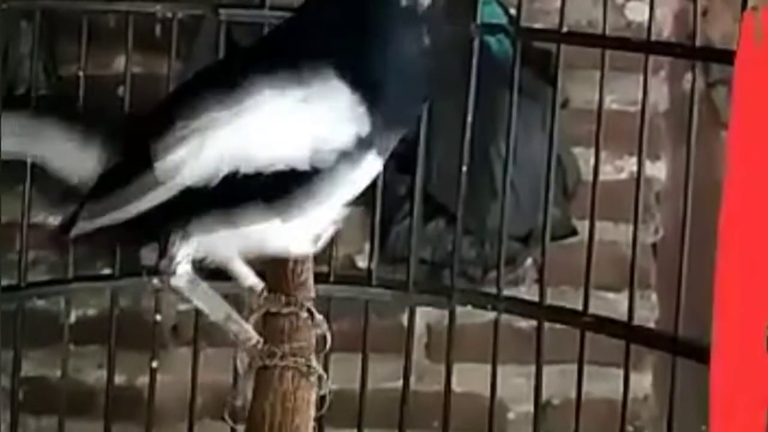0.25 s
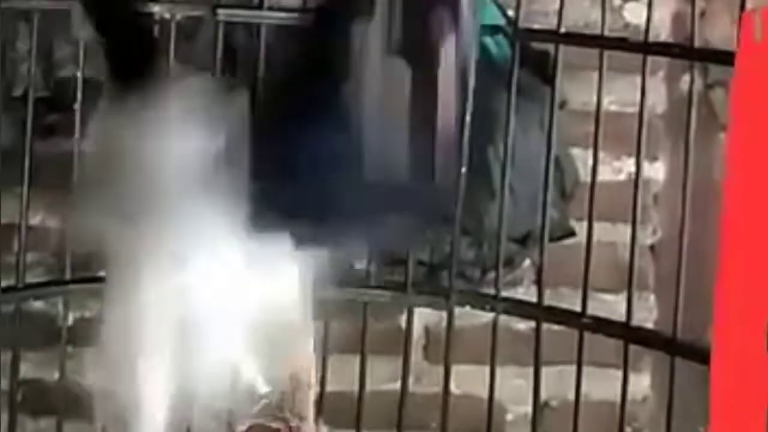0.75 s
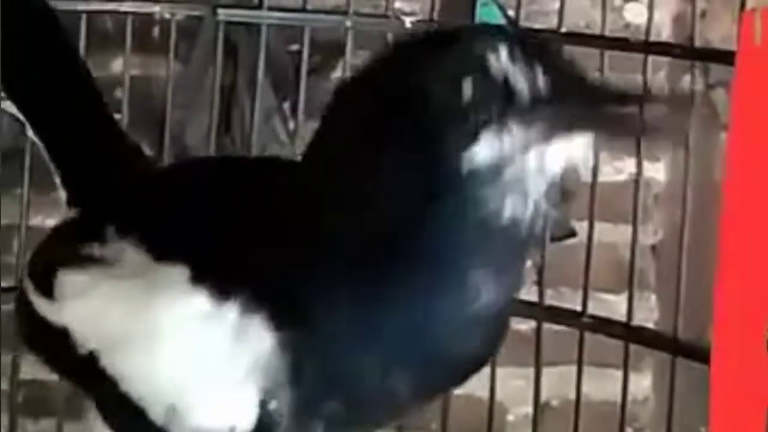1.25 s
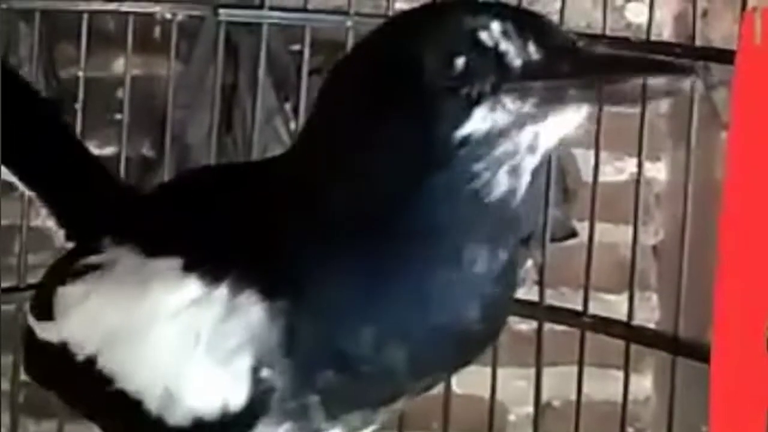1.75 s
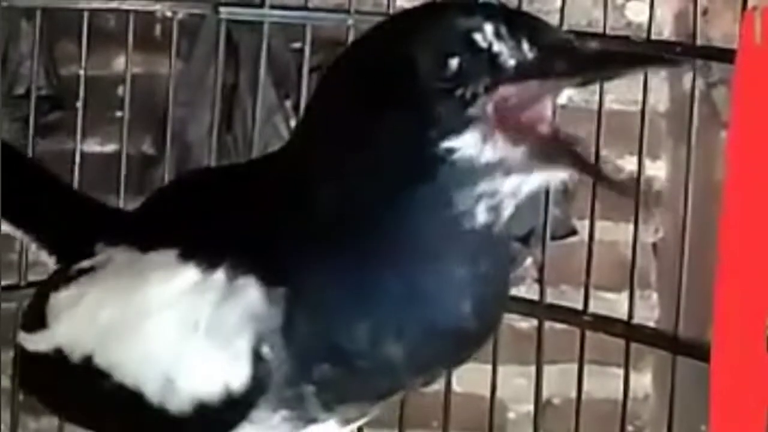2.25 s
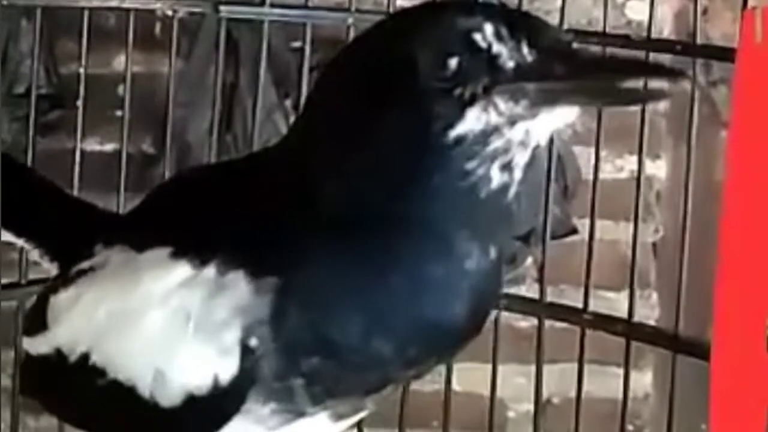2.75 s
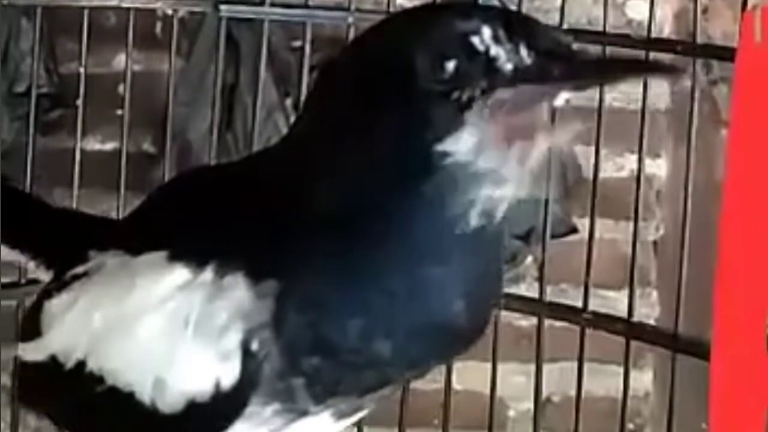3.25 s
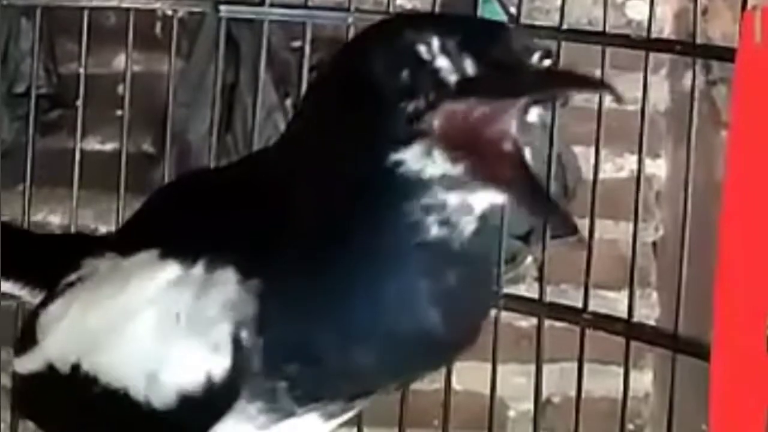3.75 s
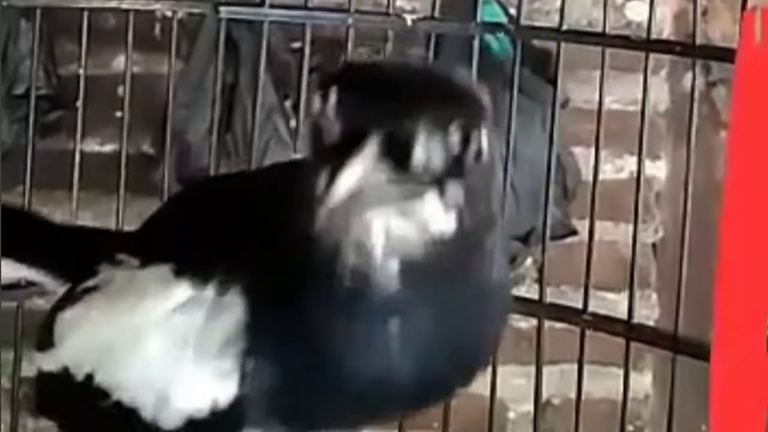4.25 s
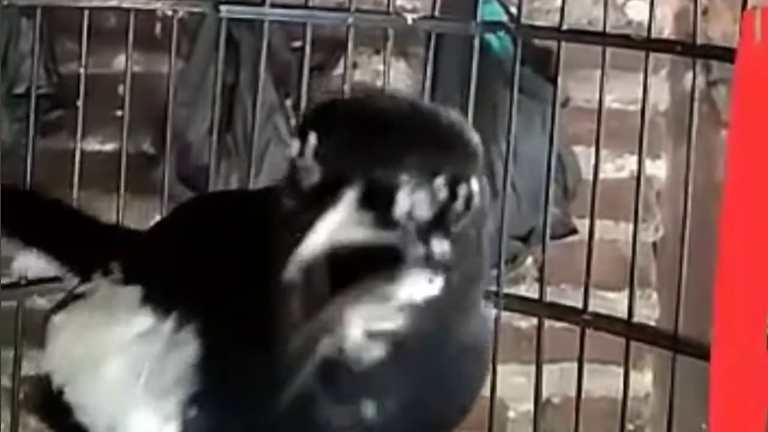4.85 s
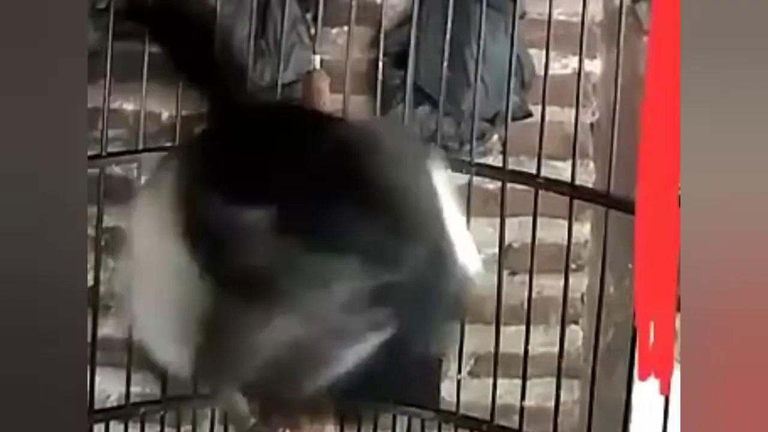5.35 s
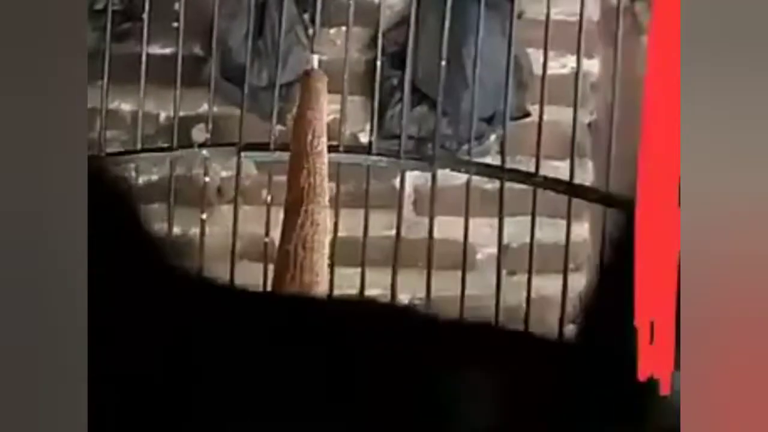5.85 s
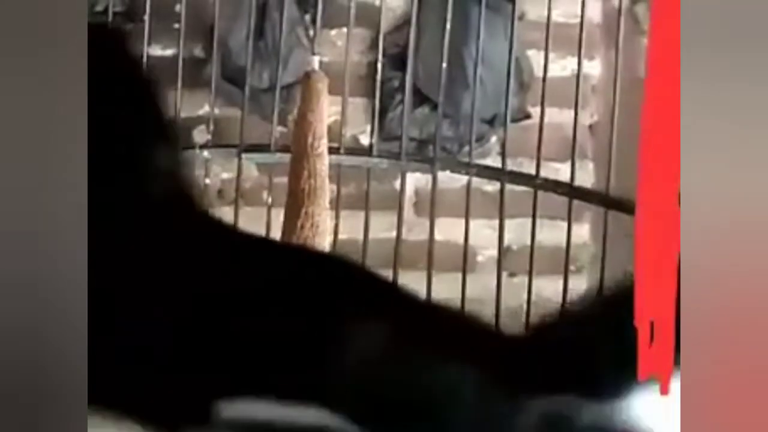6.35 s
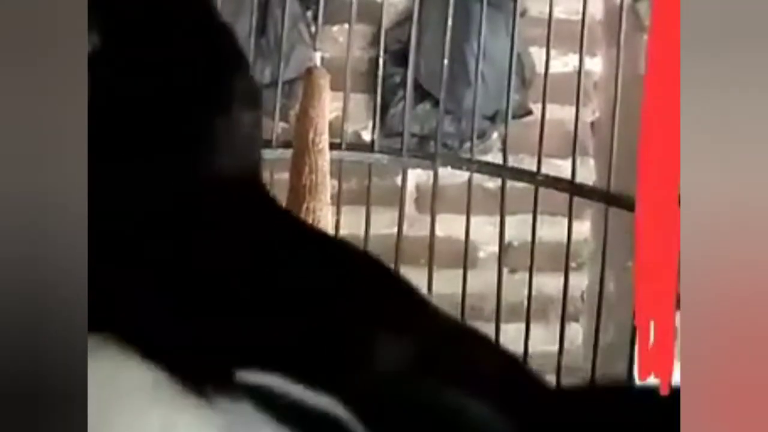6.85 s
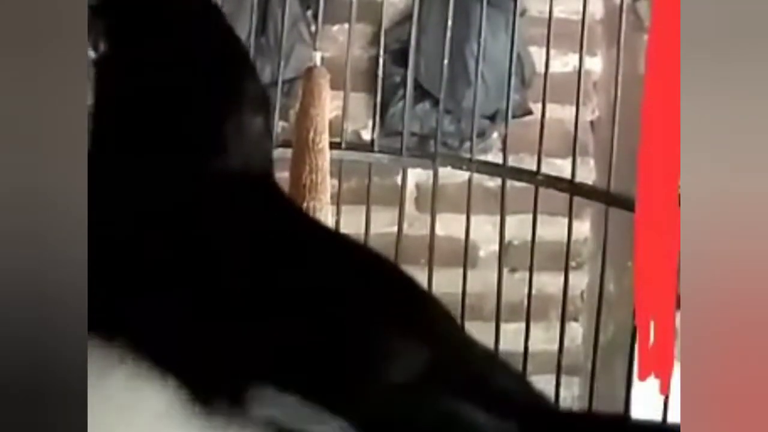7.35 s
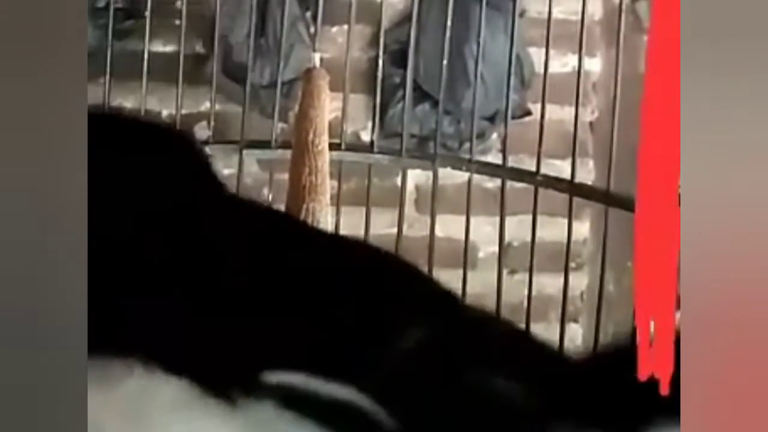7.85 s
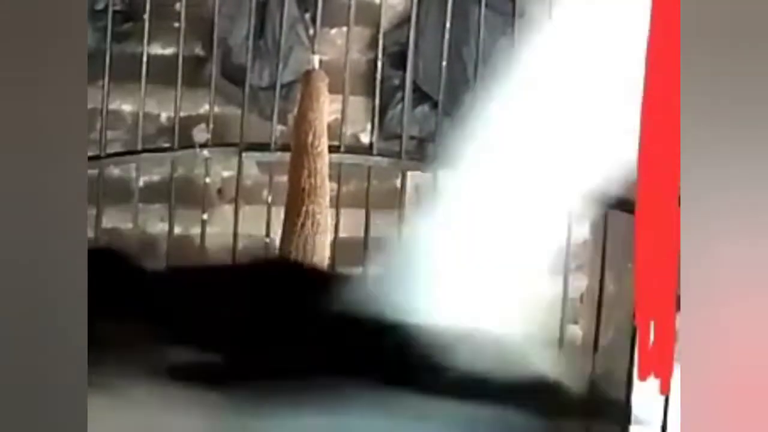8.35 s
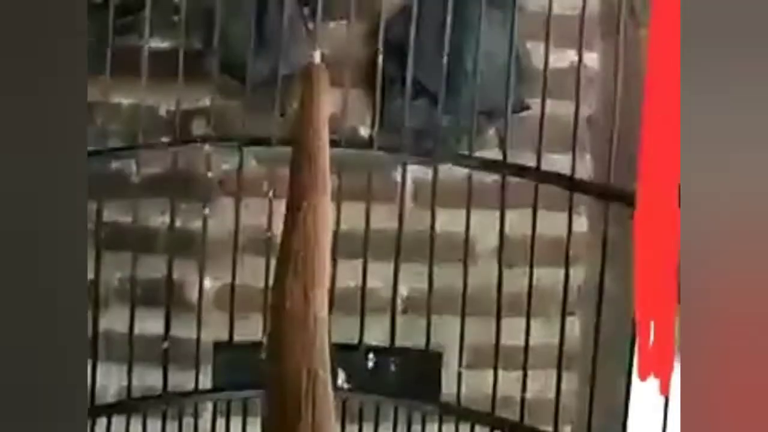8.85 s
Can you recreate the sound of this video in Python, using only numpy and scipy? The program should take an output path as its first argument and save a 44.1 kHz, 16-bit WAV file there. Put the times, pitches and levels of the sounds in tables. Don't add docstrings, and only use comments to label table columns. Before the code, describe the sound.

A caged songbird sings very close to a stereo microphone in a small room with short reflections and a low murmur. From 0.1 to 1.3 seconds it throws out sharp high notes, quick plunges, whistles and noisy rasps; a second bird behind adds softer, lower, nearly pure whistles until about 2.4. Two downward pews come near 1.4 and 1.6, a shaking note at 1.85, then a rapid clicking trill from 2 to 2.5. Softer whistles, a raspy churr at 3.1 and buzzing arched notes follow. Forceful whistles strike around 4.4 and 4.6, then a second trill runs from 5 to 5.5. Bright loud whistles and a squeal fill 5.9 to 6.5. A thin high glide sinks from 6.7 to 7.4. Rasps sound at 7.7 over a faint distant two-toned hoot, 7.5 to 8. Nasal dips, quick leaps and a quavering whistle end around 9. Breath puffs flutter throughout.

```python
import sys
import numpy as np
from scipy import signal
from scipy.fft import rfft, irfft, next_fast_len
from scipy.io import wavfile
from scipy.ndimage import uniform_filter1d, minimum_filter1d

SR = 44100
rng = np.random.default_rng(int(sys.argv[2]) if len(sys.argv) > 2 else 0)


def magnitude_from_level(level_db):
    exponent = np.asarray(level_db, float) / 20
    return 10 ** exponent


def transcribe(signal):
    frames = np.atleast_2d(signal).T
    limited = np.clip(frames, -1, 1)
    pcm = np.round(limited * 32767).astype(np.int16)
    wavfile.write(sys.argv[1], SR, pcm)


N = 400869

# frequency in Hz, level in dB per Hz.
FLOOR_COLOUR = [(20, -11), (50, -19), (110, -33), (480, -39), (800, -31), (13000, -34)]
BUFFET_COLOUR = [(25, -5), (120, -3), (250, -9), (1200, -19), (2500, -20)]
HISS_COLOUR = [(1000, -26), (4000, -7.5), (13500, -9)]
RASP_COLOUR = [(30, -19.5), (600, -15), (3000, 8.5), (13500, -1.5)]
THIN_COLOUR = [(300, -42.5), (2200, 0.5), (4000, -5), (6500, -3.5), (13500, -12.5)]
CLICK_COLOUR = [(1000, -27), (3500, -12.5), (5000, -1), (7500, -4), (13500, -14.5)]

# time in seconds, left lag in samples, left minus right in dB.
BEAK = [
    (0, 5.5, 6.5),
    (5, 4, 3),
    (7.1, 3, 6),
    (7.7, -0.5, 11.5),
]
FAR_LAG, FAR_PAN_DB = -5, 9

# start in seconds, length in seconds, start pitch in Hz, end pitch in Hz, level in dB.
SIDE_NOTES = [(.115, 0.034, 764, 780, -51), (.352, 0.016, 4480, 4590, -15),
              (1.095, 0.028, 3950, 3503, -27.5), (1.1, 0.04, 1967, 1730, -27.5),
              (4.13, 0.054, 5020, 3220, -21), (5.255, 0.035, 1330, 1177, -32),
              (8.91, 0.037, 4300, 3600, -28.5), (8.925, 0.052, 6220, 5100, -34)]
HOOKS = [(.143, 0.055, 7890, 5300, -22.5)]
WHISTLES = [(.435, 0.085, 2143, 2390, -26.5), (.5, 0.076, 2330, 2283, -10.5),
            (1.28, 0.081, 2270, 2450, -23.5), (1.29, 0.03, 2854, 3005, -14), (2.36, 0.17, 1846, 1978, -9.5),
            (2.555, 0.23, 2343, 2393, -19.5), (2.835, 0.083, 2884, 2914, -24.5),
            (4.98, 0.031, 1360, 1190, -19), (5.03, 0.078, 1743, 2004, -20), (5.09, 0.076, 2243, 1929, -19),
            (8.58, 0.072, 2273, 1994, -20), (8.975, 0.027, 2480, 2432, -15)]
QUAVERS = [
    (0.476, 0.035, 3410, 3786, -18.5),
    (1.847, .12, 3330, 3475, -18),
    (4.868, 0.1, 3372, 3894, -15.5),
]
CHIRPS = [(.74, 0.066, 2757, 2410, -28), (.83, .08, 2670, 2590, -26.5)]
FLICKS = [(.93, 0.069, 3116, 3310, -6)]
PEWS = [(1.354, 0.03, 2500, 1350, -17), (1.635, 0.037, 2598, 1396, -16.5)]
PEW_OVERTONES = [(1.368, 0.021, 3864, 2750, -19.5), (1.652, 0.026, 3870, 2890, -24.5)]
NASALS = [(2.585, 0.058, 1387, 1247, -33), (5.555, 0.069, 1321, 1280, -27),
          (5.565, 0.052, 1392, 1335, -34.5)]
CHURRS = [(3.036, 0.16, 998, 993.5, -36), (7.66, .148, 1054, 1023, -41)]
ARCHES = [(3.328, 0.15, 2966, 2437, -28.5), (8.007, 0.17, 2988, 2449, -30.5)]
DIPS = [(3.597, .165, 2455, 2372, -28.5)]
COOS = [(3.772, .155, 1903, 1755, -23.5)]
UPBEATS = [(4.337, 0.018, 2125, 2457, -13), (4.593, 0.028, 2070, 2560, -10.5),
           (5.882, 0.055, 2900, 2900, -7), (6.07, 0.043, 2290, 2150, -18.5), (6.405, 0.054, 2670, 3000, -9)]
SPIKES = [(4.35, 0.013, 2110, 3490, -13.5), (4.609, 0.013, 2084, 3210, -13.5),
          (6.106, 0.011, 2080, 3460, -14.5)]
SHOUTS = [(4.36, 0.07, 2308, 2450, -8.5), (4.618, 0.06, 2400, 2290, -8), (6.111, 0.041, 2480, 2503, -8)]
CROAKS = [(5.41, 0.12, 1920, 2084, -38.5), (5.48, 0.075, 2915, 2586, -34.5)]

# start in seconds, length in seconds, start pitch in Hz, end pitch in Hz, level in dB.
FAR_SWELLS = [(.175, 0.099, 1870, 1990, -31), (.255, .08, 2018, 2085, -24.5), (.73, 0.086, 834, 948, -43),
              (.787, 0.046, 1152, 1350, -23.5), (.85, 0.06, 1510, 1536, -17),
              (.98, 0.047, 1484, 1193, -24.5), (1.075, 0.069, 1504, 1090, -24),
              (1.42, .12, 724, 1070, -33.5), (1.636, 0.089, 752, 1003, -34.5),
              (1.92, 0.092, 1144, 1746, -27.5), (2.112, 0.056, 1685, 1740, -15),
              (1.533, 0.014, 1210, 1240, -22.5), (1.548, 0.018, 1330, 1320, -25),
            (1.718, .024, 1238, 1262, -22), (1.74, 0.016, 1284, 1274, -19.5),
            (2.058, 0.018, 1780, 1760, -27.5), (2.089, 0.022, 1770, 1690, -17.5),
            (2.205, .087, 1841, 1801, -13.5)]
FAR_FADES = [(1.555, 0.057, 1314, 1440, -36.5), (1.75, 0.05, 1294, 1355, -32.5),
             (1.83, 0.19, 844, 1060, -37), (1.982, 0.034, 1694, 1850, -12.5),
             (2.285, 0.059, 1793, 1810, -26.5)]
UNDERTONES = [(6.2, 0.25, 1513, 1546, -39), (6.86, .26, 1608, 1506, -40.5)]

# second partial in dB, third partial in dB, flutter (0 is
# steady, about 1 very rough; below 0 the wander flips and its slow part shrinks), buffeting in dB.
SIDE_NOTE = ([(0, 0.0072, -3), (.5, 0, -2), (1, 0, 2)], (-10, -35, 0.37, -78))
HOOK = ([(0, -0.0073, 7), (.16, -0.22, -9), (.55, -.1, 2.5), (1, 0.04, -10.5)], (-13.5, -17, 0.22, -42))
WHISTLE = ([(0, 0.0034, -4.5), (.55, 0.018, -5.5), (1, 0.026, -24.5)], (-27, -36, 0.25, -75.5))
QUAVER = ([(0, -.2, -10), (.1, 0, 0), (.75, 0, 0), (1, -.04, -8)], (-22, -28, .09, -24))
CHIRP = ([(0, 0.005, -1.5), (.42, 0.12, -1), (1, 0.017, 5.5)], (-2.5, -2.5, 0.26, -29))
FLICK = ([(0, 0.012, -17), (.3, 0.34, -15), (.68, 0.21, -17), (1, 0.11, -3.5)], (-16.5, -15.5, 0.24, -26))
PEW = ([(0, -0.11, -11), (.2, 0.066, 2), (.65, -.07, -3.5), (1, 0.0026, -5.5)], (-11.5, -28, -0.3, -88.5))
NASAL = ([(0, 0.04, -7), (.3, 0, 0), (1, 0, -4.5)], (14.5, -3.5, 0.4, -63))
CHURR = (([(0, 0, 0), (.25, .16, -1.5), (.65, .13, -2.5), (1, -.04, -1)], (6, 7, .05, -40)))
ARCHED = ([(0, -0.15, -3.5), (.07, -0.02, 1), (.57, 0.14, 2), (.84, .15, 4), (1, -0.063, 2.5)],
           (0.5, -8.5, 0.16, -32))
DIP = ([(0, .0, -1), (.18, -.085, -4.5), (.32, -.03, -2.5), (.5, -.005, -1), (.7, -.025, -1.5),
        (1, 0, -18)], (5.5, -5.5, 0.28, -25.5))
COO = (([(0, .02, -.5), (.17, -.03, -.3), (.55, .04, -1.5), (1, -.01, -8)], (-2, -5, .03, -44)))
UPBEAT = (([(0, 0, -14), (.4, -.09, -7), (.8, -.08, -4), (1, 0, -.5)], (-31, -42, .04, -48)))
SPIKE = ([(0, 0, -7), (.6, 0.036, 1.5), (1, 0, -18.5)], (-15.5, -38, 1.32, -60.5))
SHOUT = (([(0, 0, -1.5), (.45, .015, .3), (.82, .012, -2.5), (1, -.06, -12)], (-29, -35, .06, -44)))
CROAK = ([(0, 0, -4), (.5, 0, 0), (1, 0, -3)], (-25, -35, 1.2, -60))
FAR_SWELL = ([(0, 0.00037, -1), (.45, 0.021, 3), (1, 0.012, 1)], (-22, -40, 0.04, -69.5))
FAR_FADE = ([(0, 0.0042, 4), (.45, .003, -2), (1, 0, -29)], (-32, -40, 0.12, -99.5))
UNDER = ([(0, 0.01, -5), (.3, .13, -3.5), (.5, .24, -5), (.62, .24, 0.5), (1, 0, -7)], (4, 9.5, 0.11, -67))

# time in seconds, pitch in Hz, level in dB.
STAIRS = ([(.24, 4900, -24), (.253, 4400, -22), (.258, 4100, -36), (.266, 3850, -30), (.272, 3610, -33),
           (.28, 3500, -26.5), (.298, 3170, -23)], (-13, -19, 0.24, -46.5))
PLUNGE = ([(.324, 3930, -21), (.334, 3780, -20), (.337, 3300, -22), (.343, 2610, -15), (.35, 2090, -26),
           (.366, 2600, -24)], (-22, -16, 0.32, -26.5))
RISER = ([(.438, 3380, -19), (.45, 4200, -43.5), (.465, 4080, -9)], (2.5, -23, 0.13, -43.5))
SOMERSAULT = ([(.543, 2428, -24), (.56, 3150, -20), (.578, 3700, -23), (.587, 2610, -19), (.605, 2467, -6)],
               (-11.5, -20, 0.39, -30.5))
CLIMB = ([(1.025, 3900, -23), (1.05, 5060, -27.5), (1.09, 5200, -36), (1.15, 5260, -29)],
          (-12, -22, 0.1, -24))
CREST = ([(1.146, 2650, -24), (1.156, 3100, -14.5), (1.166, 3230, -7), (1.175, 3130, -17),
          (1.183, 2800, -15)], (-17, -28, 0.18, -32.5))
SLIDE = ([(1.181, 2796, -16), (1.188, 2730, -10.5), (1.21, 2465, -23.5), (1.222, 2143, -22.5),
          (1.245, 1830, -32)], (-21, -28, 0.48, -39.5))
HICCUP = ([(2.741, 2150, -25), (2.756, 2700, -16), (2.78, 2150, -20), (2.803, 1750, -26)],
           (-30, -33, .05, -85))
FIRST_RUN_UP = ([(4.006, 1730, -29.5), (4.02, 2464, -30), (4.045, 2530, -20), (4.065, 3120, -32)],
                 (-3.5, -17.5, 0.42, -26))
FIRST_VAULT = ([(4.058, 3860, -30), (4.08, 4100, -20), (4.112, 4210, -25), (4.118, 3400, -20),
                (4.137, 2264, -25.5), (4.195, 1653, -36)], (-8.5, -13.5, 0.37, -30))
YELP = ([(5.929, 3330, -21), (5.936, 3584, -15.5), (5.968, 3450, -13), (5.976, 3534, -10),
         (5.984, 3000, -20.5)], (-26, -23.5, 0.3, -38.5))
SQUEAL = ([(6.21, 4940, -30), (6.242, 4740, -29), (6.256, 4550, -25), (6.282, 4570, -22),
           (6.31, 4550, -18.5), (6.322, 4370, -18), (6.334, 3100, -23)], (-12.5, -27, 0, -36))
DIVE = ([(6.45, 2840, -4), (6.457, 3155, -12), (6.475, 2360, -12), (6.495, 2170, -22.5),
         (6.522, 2205, -39)], (-16, -25, 0.06, -54.5))
LONG_GLIDE = ([(6.737, 3460, -31), (6.772, 3880, -26), (6.846, 4357, -22), (6.962, 4208, -26.5),
               (7.084, 4004, -27), (7.13, 3860, -23.5)], (-13.5, -19.5, 0.12, -103))
GLIDE_DOWN = ([(7.12, 3830, -27.5), (7.2, 3443, -22.5), (7.34, 2825, -30), (7.4, 2814, -44)],
               (-13, -23, 0.25, -97))
DEEP_DIP = ([(8.318, 2574, -32), (8.332, 2445, -30.5), (8.352, 2299, -31.5), (8.396, 2630, -32.5),
             (8.42, 2500, -31.5), (8.442, 2495, -33.5), (8.462, 2286, -22.5)], (0.5, -9, 0.17, -27.5))
THIN_COO = ([(8.518, 1978, -38), (8.55, 1922, -39), (8.605, 1990, -38), (8.65, 1916, -39.5),
             (8.685, 1837, -40)], (4.5, 2, 0.21, -44.5))
RUN_UP = ([(8.79, 1630, -44), (8.8, 2540, -36.5), (8.81, 2350, -31), (8.827, 2410, -29)],
           (2.5, -11, 0.39, -28.5))
VAULT = ([(8.826, 2297, -20), (8.838, 3890, -35), (8.865, 4510, -29), (8.898, 4590, -28),
          (8.912, 2677, -35), (8.94, 1994, -51), (8.972, 1710, -37)], (-16.5, -15, 0.37, -37.5))

# one note (start and length in seconds, start and end pitch in Hz, level in dB),
# then its voice.
LAST_QUAVER = ((8.996, 0.3, 2048, 1799.5, -27), (-19, -27, 0.17, -52.5))

# start in seconds, length in seconds, top pitch in Hz,
# level in dB.
WARBLE = [
    (1.994, 0.037, 3435, -16),
    (4.999, 0.042, 3550, -13),
]
TRILL = [(2.033, 0.041, 3354, -17), (2.185, 0.033, 3470, -16.5), (2.236, 0.039, 3430, -18),
         (2.293, 0.043, 3390, -22.5), (2.347, 0.039, 3350, -21.5), (2.412, 0.03, 3300, -23),
         (2.469, 0.034, 3270, -23), (5.043, 0.033, 3480, -13), (5.168, 0.047, 3520, -14),
         (5.226, 0.038, 3445, -17), (5.277, 0.043, 3400, -16), (5.334, 0.044, 3395, -18.5),
         (5.394, 0.041, 3325, -17), (5.472, 0.035, 3340, -23)]
ARCH = [
    (0, .62),
    (.17, .94),
    (.45, 1),
    (.78, .975),
    (1, .72),
]
# second partial in dB, third partial in dB, flutter from 0 to 1.
TRILL_VOICING = (-19, -30, .12)

# start in seconds, length in seconds, level in dB.
PUFFS = [(0.423, 0.066, -34), (3.05, 0.084, -22), (4.322, 0.11, -33), (4.594, 0.027, -37),
         (5.033, 0.017, -53.5), (5.903, 0.072, -33), (6.43, 0.033, -33.5), (6.799, 0.096, -34.5)]

# time in seconds, peak level in dB.
RASPS = [(0.343, -15), (1.0664, -12), (1.1724, -33), (3.09, -14), (3.111, -15.5), (4.365, -15.5),
         (4.625, -18.5), (5.585, -27.5), (6.4874, -19.5), (6.8259, -28.5), (7.704, -11.5), (7.7374, -15),
         (8.4477, -16), (8.9, -13)]
QUAVER_HISS = [
    (0.499, -16.5),
    (1.901, -14),
    (4.918, -15),
]
THIN_RASPS = [(0.229, -8.5), (1.545, -33.5), (1.735, -28), (5.72, -49.5), (5.878, -32.5), (6.2, -18.5),
              (8.005, -34.5), (8.316, -25.5), (0.45, -11), (0.585, -18), (1.368, -21.5), (1.645, -21.5),
              (2.5471, -11), (3.32, -36), (3.598, -22), (3.774, -21), (4.858, -13.5)]

# time in seconds, level in dB.
HOOT = [
    (7.5, -100),
    (7.55, -49.5),
    (8.0, -50.5),
]
# frequency in Hz, level in dB.
HOOT_TONES = [
    (775, -11.5),
    (861, -4.5),
]


def at(rows, x, column):
    rows = np.array(rows)
    return np.interp(x, rows[:, 0], rows[:, column])


def rms_one(x):
    return x / np.sqrt(np.mean(x ** 2) + 1e-20)


def ports(left_db, right_db):
    return magnitude_from_level(np.array([[left_db], [right_db]]))


def wobble(hz, size):
    lowpass = signal.butter(3, hz, fs=SR, output="sos")
    return rms_one(signal.sosfilt(lowpass, rng.standard_normal(size + 4000))[4000:])


def coloured(spectrum, alike):
    size = next_fast_len(N)
    shared, left, right = rng.standard_normal((3, size))
    pair = np.sqrt(alike) * shared + np.sqrt(1 - alike) * np.array([left, right])
    hz = np.maximum(np.arange(size // 2 + 1) * SR / size, 1)
    points = np.array(spectrum)
    gain_db = np.interp(np.log(hz), np.log(points[:, 0]), points[:, 1], left=-40, right=-60)
    return rms_one(irfft(rfft(pair) * magnitude_from_level(gain_db), size)[:, :N])


def background():
    return magnitude_from_level(-55.5) * coloured(FLOOR_COLOUR, alike=0.13)


def contour(note, shape):
    s, length, start_hz, end_hz, db = note
    rows = []
    for share, lift, shade_db in shape:
        glide_hz = start_hz + share * (end_hz - start_hz)
        rows.append((s + share * length, glide_hz * (1 + lift), db + shade_db))
    return rows


def quaver(note, shape):
    shakes_per_s, depth = 34, 0.048
    rows = contour(note, shape)
    s = np.linspace(note[0], note[0] + note[1], num=40)
    shake = 1 + depth * np.sin(2 * np.pi * shakes_per_s * (s - s[0]))
    return list(zip(s, at(rows, s, 1) * shake, at(rows, s, 2)))


def syrinx_note(out, rows, voice, lag, pan_db, tapes, count=12):
    second_db, third_db, flutter, breath_db = voice
    first, last = int(rows[0][0] * SR), min(int(rows[-1][0] * SR), N)
    t = np.arange(first, last) / SR

    def piece(tape):
        start = rng.integers(N - len(t))
        return tape[start:start + len(t)]

    slow, fast, wide = tapes
    shortest_s = np.diff(np.array(rows)[:, 0]).min()
    bend = int(np.clip(shortest_s * SR * 0.77, 60, len(t) // 3 + 100))
    pitch = uniform_filter1d(at(rows, t, 1), bend, mode="nearest")
    pitch = pitch * (1 + (.002 + .015 * flutter) * piece(slow))
    phase = 2 * np.pi * np.cumsum(pitch) / SR
    edge = np.clip(np.minimum((t - t[0]) / .005, (t[-1] - t) / .006), 0, 1) ** 1.5
    level = np.sqrt(2) * magnitude_from_level(at(rows, t, 2)) * edge
    flow = magnitude_from_level(breath_db) * np.sin(np.pi * np.linspace(0, 1, len(t))) ** 0.3
    out[2:, first:last] += flow * np.array([[1], [flutter]])

    for k in range(1, min(int(14000 / pitch.min()), count) + 1):
        if k < 4:
            partial_db = [0, second_db, third_db][k - 1]
        else:
            partial_db = min(third_db, second_db - 3) - 1.8 * (k - 3)
        if partial_db < -42:
            continue
        turn = rng.normal(0, 0.14 * k) * (k > 1) + np.clip(np.pi * k * pitch * lag / SR, -1, 1)
        lean_db = (pan_db - 0.59 * np.maximum(k * pitch - 5000, 0) / 1000) / 2
        shake = flutter * np.sqrt(k) * piece(fast)
        beat_depth_db = 1 + .9 * min(k - 1, 3) + 12 * min(flutter, .25)
        for port, side in enumerate((1, -1)):
            beat = magnitude_from_level(beat_depth_db * piece(slow) + 3.7 * flutter * piece(fast))
            beat = beat + 0.5 * flutter * piece(wide)
            tone = np.sin(k * phase + shake - side * turn) * (k * pitch < 15000)
            out[port, first:last] += level * beat * magnitude_from_level(partial_db + side * lean_db) * tone


def near_bird(out, tapes):
    kinds = [(SIDE_NOTES, SIDE_NOTE), (HOOKS, HOOK), (WHISTLES, WHISTLE), (CHIRPS, CHIRP), (FLICKS, FLICK),
             (PEWS, PEW), (PEW_OVERTONES, SIDE_NOTE), (NASALS, NASAL), (CHURRS, CHURR), (ARCHES, ARCHED),
             (DIPS, DIP), (COOS, COO), (UPBEATS, UPBEAT), (SPIKES, SPIKE), (SHOUTS, SHOUT), (CROAKS, CROAK)]
    sung = [(contour(note, shape), voice) for notes, (shape, voice) in kinds for note in notes]
    sung += [(quaver(note, QUAVER[0]), QUAVER[1]) for note in QUAVERS]
    sung += [(quaver(LAST_QUAVER[0], QUAVER[0]), LAST_QUAVER[1])]
    sung += [STAIRS, PLUNGE, RISER, SOMERSAULT, CLIMB, CREST, SLIDE, HICCUP, FIRST_RUN_UP, FIRST_VAULT,
             YELP, SQUEAL, DIVE, LONG_GLIDE, GLIDE_DOWN, DEEP_DIP, THIN_COO, RUN_UP, VAULT]
    trill_breath_db = -27.5
    for s, length, hz, db in WARBLE + TRILL:
        arch = [(s + share * length, pitch * hz, db - 26 * (1 - pitch)) for share, pitch in ARCH]
        sung.append((arch, (*TRILL_VOICING, trill_breath_db)))
    for rows, voice in sung:
        s = rows[0][0]
        syrinx_note(out, rows, voice, at(BEAK, s, 1), at(BEAK, s, 2), tapes)


def far_bird(out, tapes):
    kinds = [(FAR_SWELLS, FAR_SWELL, 2), (FAR_FADES, FAR_FADE, 2), (UNDERTONES, UNDER, 5)]
    for notes, (shape, voice), count in kinds:
        for note in notes:
            syrinx_note(out, contour(note, shape), voice, FAR_LAG, FAR_PAN_DB, tapes, count)


def breath_buffeting(flow):
    t = np.arange(N) / SR
    puffs = sum(magnitude_from_level(db) * np.sin(np.pi * np.clip((t - s) / length, 0, 1)) for s, length, db in PUFFS)
    tail_s = 0.0089
    keep = np.exp(-1 / (tail_s * SR))
    flow = signal.lfilter([1 - keep], [1, -keep], flow + puffs)
    lumps = magnitude_from_level(4.68 * np.array([wobble(15.5, N), wobble(47, N)]))
    return flow * ports(2, -8) * lumps * coloured(BUFFET_COLOUR, alike=0.0024)


def breath_hiss(turbulence):
    return turbulence * ports(4, 2) * coloured(HISS_COLOUR, alike=0.85)


def rasps(events, colour, swell_s):
    kicks = np.zeros(N)
    for s, db in events:
        kicks[round((s - .5 * swell_s) * SR)] = magnitude_from_level(db - 12.0)
    age = np.arange(4000) / SR / swell_s
    swell = signal.fftconvolve(kicks, (age * np.exp(1 - age)) ** 2)[:N]
    grain = magnitude_from_level(2.5 * wobble(430, N))
    return swell * grain * coloured(colour, alike=0.025) * ports(1.5, -1.5)


def all_rasps():
    lead_s = 0.0084
    ends = [(s + length - lead_s, -8.5 + 0.28 * (db + 21)) for s, length, hz, db in TRILL]
    harsh = rasps(RASPS + QUAVER_HISS, RASP_COLOUR, swell_s=0.035)
    thin = rasps(THIN_RASPS, THIN_COLOUR, swell_s=0.014)
    return harsh + thin + rasps(ends, CLICK_COLOUR, swell_s=0.009)


def patchy(x, depth_db):
    cells = signal.stft(x, nperseg=256)[2]
    field = rng.standard_normal(cells.shape[1:])
    for size, axis in ((4, 0), (4, 0), (9, 1), (9, 1)):
        field = uniform_filter1d(field, size=size, axis=axis)
    return signal.istft(cells * magnitude_from_level(depth_db * rms_one(field)), nperseg=256)[1][:, :N]


def room(x):
    t60_s = 0.21
    age = np.arange(int(.6 * SR)) / SR
    tail = rng.standard_normal((2, len(age))) * magnitude_from_level(-60 * age / t60_s) * (age > .003)
    tail = signal.lfilter([1], [1, -.3], tail)
    return signal.fftconvolve(x, tail / np.linalg.norm(tail[0]))[:, :N]


def hoot():
    t = np.arange(N) / SR
    tones = sum(magnitude_from_level(db + 0.92 * wobble(23, N)) * np.sin(2 * np.pi * hz * t) for hz, db in HOOT_TONES)
    sounding = (t > HOOT[0][0]) * (t < HOOT[-1][0])
    return np.sqrt(2) * magnitude_from_level(at(HOOT, t, 1)) * tones * sounding * ports(3, -3)


def scene():
    out = np.zeros((4, N))
    tapes = [wobble(71, N), wobble(500, N), wobble(570, N)]
    near_bird(out, tapes)
    far_bird(out, tapes)
    voice, flow, turbulence = out[:2], out[2], out[3]
    bird = voice + patchy(breath_hiss(turbulence) + all_rasps(), depth_db=5.5)
    wet = magnitude_from_level(-9.5) * room(bird[:1]) * ports(0, -4)
    return background() + bird + wet + breath_buffeting(flow) + hoot()


def suppress(x):
    masked_db, under_loudest_db, silent_db, dropped_db = -18, -45, -78.5, -34
    masked_from_hz, band_bins, chance_db = 2960, 6, 4
    hz, _, cells = signal.stft(x, SR, nperseg=512)
    power = np.mean(abs(cells) ** 2, axis=0)
    power = uniform_filter1d(uniform_filter1d(power, size=3, axis=0), size=11, axis=1)
    level_db = 10 * np.log10(power + 1e-20)
    strongest_near_db = -minimum_filter1d(-level_db, size=41, axis=0)
    top_db = np.maximum(strongest_near_db + masked_db, level_db.max(axis=0) + under_loudest_db)
    limit_db = np.maximum(top_db - 25 * (hz < masked_from_hz)[:, None], silent_db)
    bands = np.maximum.reduceat(level_db - limit_db, np.arange(0, len(hz), band_bins), axis=0)
    chance = rms_one(uniform_filter1d(rng.standard_normal(bands.shape), size=10, axis=1))
    bands = bands + chance_db * chance
    keep_db = dropped_db * np.clip(1 - bands[np.arange(len(hz)) // band_bins] / 3, 0, 1)
    return signal.istft(cells * magnitude_from_level(keep_db), nperseg=512)[1][:, :N]


def roll_off(x):
    return signal.sosfilt(signal.butter(12, 14330, fs=SR, output="sos"), x)


def record(dry):
    rounded = .95 * np.tanh(dry / .95)
    lowpass = signal.cheby2(12, 60, 13250 * 1.06, fs=SR, output="sos")
    cut = signal.sosfilt(lowpass, suppress(rounded))
    fade = np.clip((9.066 - np.arange(N) / SR) / 0.0023, .01, 1)
    return roll_off(cut * fade)


dry = scene()
out = record(dry)
transcribe(out)
```